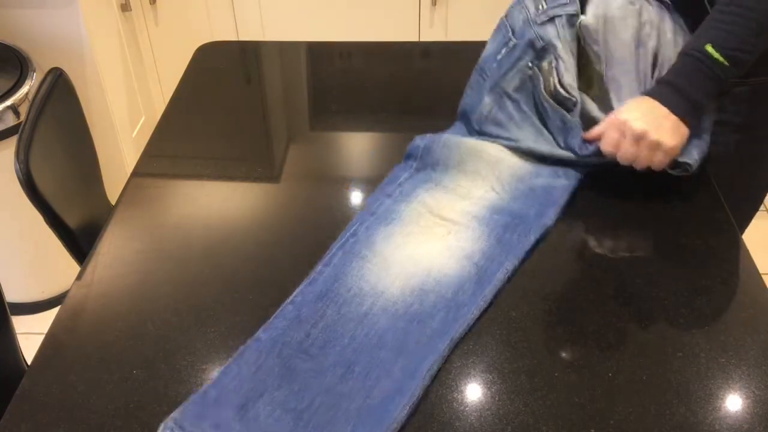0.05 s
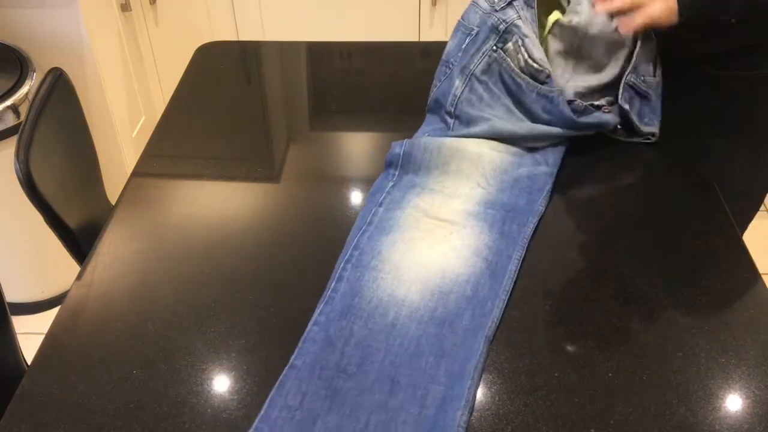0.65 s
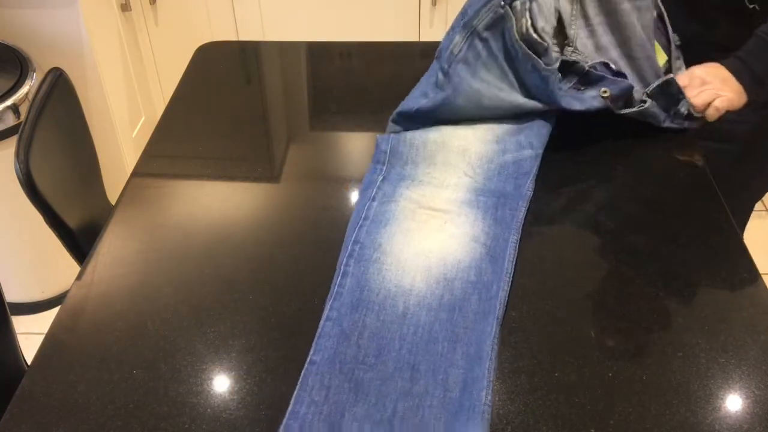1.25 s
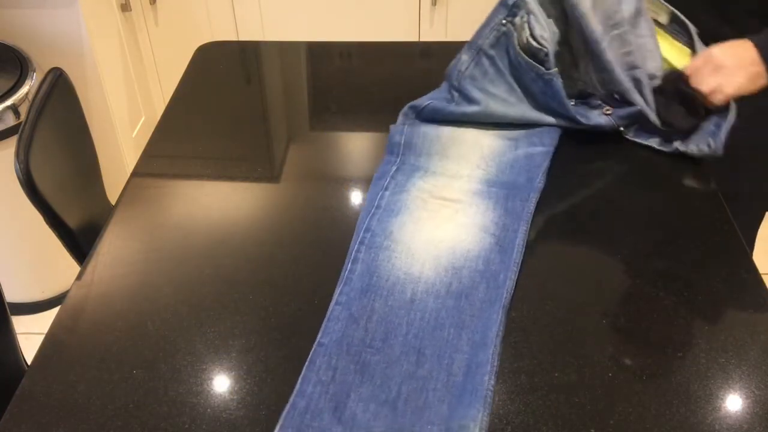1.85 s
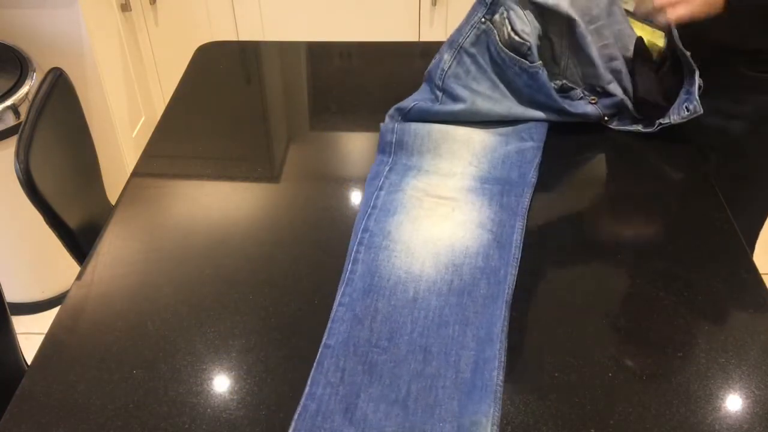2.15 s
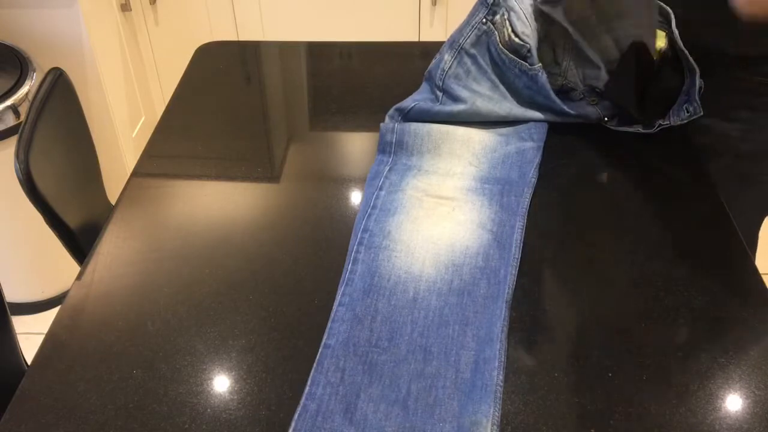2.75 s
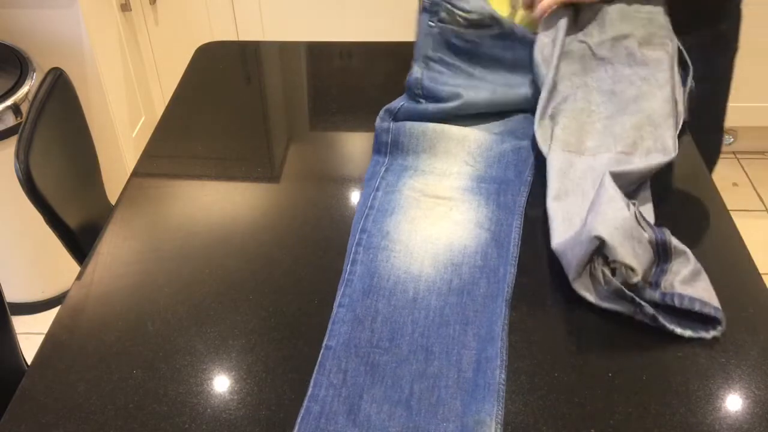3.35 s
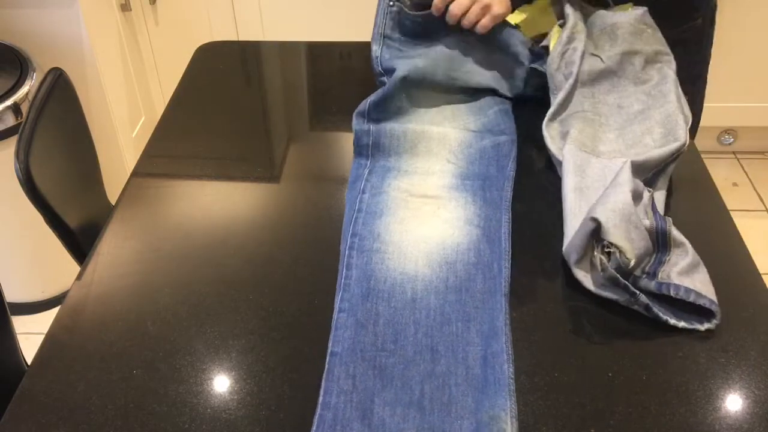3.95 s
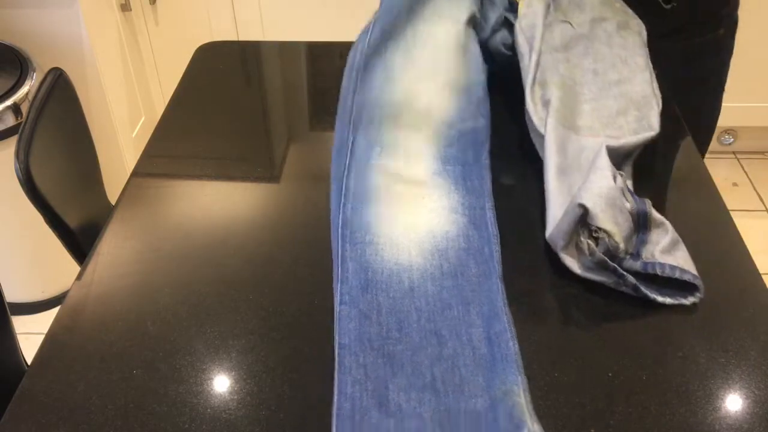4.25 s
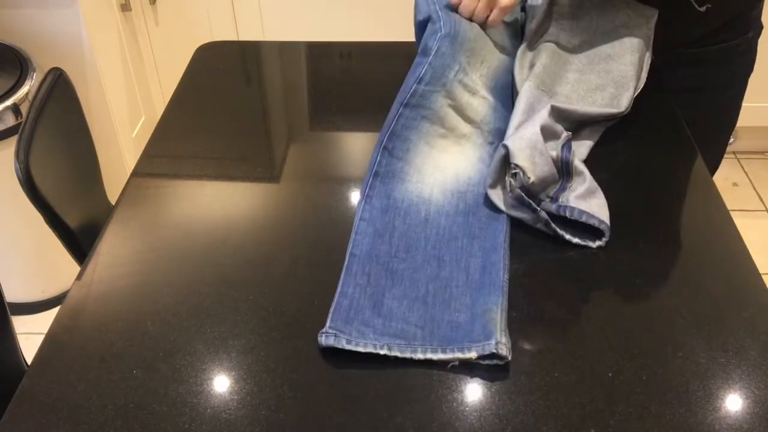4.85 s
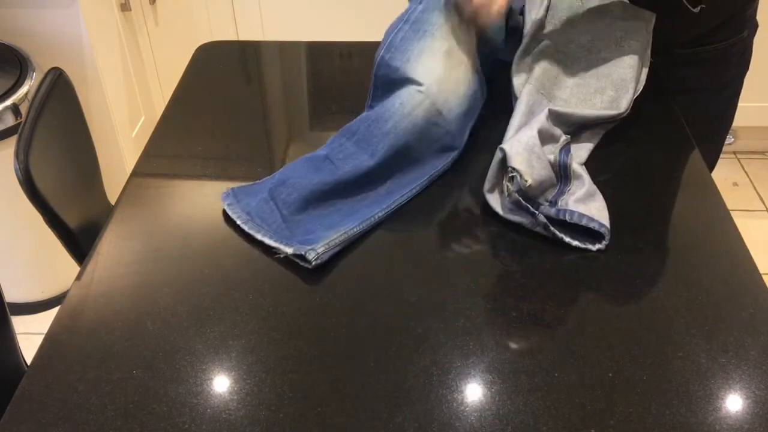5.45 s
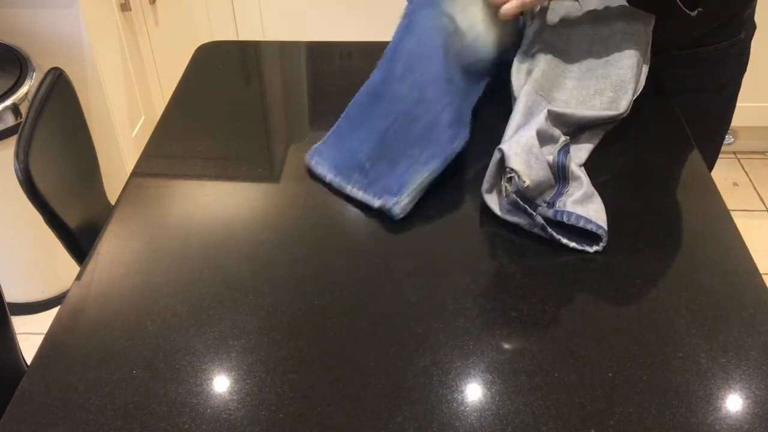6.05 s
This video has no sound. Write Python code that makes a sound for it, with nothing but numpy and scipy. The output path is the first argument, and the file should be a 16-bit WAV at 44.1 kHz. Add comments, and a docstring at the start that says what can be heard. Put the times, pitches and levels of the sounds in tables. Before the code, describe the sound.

Stiff denim flaps and rustles as a pair of jeans is handled on a kitchen counter, with a firmer thump as the cloth snaps taut. After a short lull, a rivet clicks and the waist button hits the stone with a brief metallic ring. The legs then drag and flop onto the surface again. Hard walls add a slight echo over faint, low room tone.

```python
"""A small kitchen, where a pair of heavy jeans is turned inside out on a stone worktop.
As the cloth is pulled, folds buckle in soft pops, the twill rasps and the fibres hiss.
The legs flop onto the stone, rivets and seams tick, and the metal waist button knocks and rings.
Hard walls add a short echo over a quiet room tone."""
import sys
import numpy as np
from scipy import signal
from scipy.fft import rfft, irfft
from scipy.io import wavfile
from scipy.ndimage import uniform_filter1d, map_coordinates

SR = 44100
rng = np.random.default_rng(int(sys.argv[2]) if len(sys.argv) > 2 else 0)


def master(y):
    """Save y as 16-bit WAV."""
    cut = np.clip(np.atleast_2d(y).T, -1, 1)
    pcm = np.round(cut * 32767)  # scale
    wavfile.write(sys.argv[1], SR, pcm.astype(np.int16))


N = 272979
TIME = np.arange(N) / SR

# the button strikes the stone, then chatters, held down by the cloth: t/s, crack gain/dB, ring gain/dB
BUTTON_HITS = [(3.183, -35, -27.5), (3.1868, -29.5, -42), (3.197, -42, -47), (3.204, -44, -49)]


def undb(db):
    """Decibels to gain."""
    return 10 ** (np.asarray(db) / 20)


def unit(x):
    """Scale to rms 1."""
    return x / np.sqrt(np.mean(x ** 2))


def add(out, start_s, x):
    """Mix x into out from start_s on."""
    i = max(int(start_s * SR), 0)
    out[i:i + len(x)] += x[:N - i]


def on_log_axis(hz, points):
    """Read a curve of (f/Hz, value) points at any frequency."""
    f, value = np.transpose(points)
    return np.interp(np.log(hz + 1), np.log(f), value)


def colour(x, eq, size=4096):
    """Minimum-phase EQ of unit energy, shaped by (f/Hz, level/dB) points."""
    gain = undb(on_log_axis(np.fft.rfftfreq(size, 1 / SR), eq))
    cepstrum = irfft(np.log(gain))
    cepstrum[1:size // 2] *= 2
    cepstrum[size // 2 + 1:] = 0
    response = irfft(np.exp(rfft(cepstrum)))
    return signal.fftconvolve(x, response / np.linalg.norm(response))[:len(x)]


def wander(rate_hz):
    """Smooth random modulation of rms 1, with rate_hz new targets a second."""
    hold = max(int(SR / rate_hz), 1)
    steps = np.repeat(rng.standard_normal(N // hold + 1), hold)
    return unit(uniform_filter1d(uniform_filter1d(steps, hold), hold)[:N])


def slips(per_s, scatter_db):
    """Grains of friction: tiny impulses of uneven size at random moments."""
    chance, size = rng.random(N), rng.standard_normal(N)
    return (chance < per_s / SR) * rng.choice([-1, 1], N) * undb(scatter_db * size)


def steady(x, span_s):
    """Even out the slow swells of a grain stream and keep its fine texture."""
    power = uniform_filter1d(x ** 2, max(int(span_s * SR), 1))
    return x / np.sqrt(np.abs(power) + np.mean(x ** 2) / 20)


def room_tone(level_db=-64.4, waver_db=0.7):
    """The quiet, low bed of the kitchen, wavering a little."""
    # colour of the background: f/Hz, level/dB
    air_eq = [(20, -16), (40, 1), (75, 5.5), (150, -1), (280, -4), (420, -7), (900, -12.5), (1600, -11.5),
              (1950, -7), (2700, -14), (5000, -21), (15000, -29)]
    return undb(level_db + waver_db * wander(1.5)) * unit(colour(rng.standard_normal(N), air_eq))


def kitchen_reverb(x, wet_db, predelay_s=0.00397, count=24000):
    """Mix in dense reflections off cupboards and tiles; the top end dies first."""
    # decay of the room: f/Hz, t60/s
    decay_times = [(100, 0.55), (300, 0.33), (1000, 0.6), (3000, 0.44), (8000, 0.43), (15000, 0.076)]
    t, tail = TIME[:count], 0
    edges_hz = np.geomspace(40, 18000, 10)
    for lo, hi in zip(edges_hz, edges_hz[1:]):
        bandpass = signal.butter(3, [lo, hi], "band", fs=SR, output="sos")
        band = signal.sosfilt(bandpass, rng.standard_normal(count))
        t60 = on_log_axis(np.sqrt(lo * hi), decay_times)
        tail = tail + band * np.exp(-np.log(1000) * t / t60)
    tail = tail * (t > predelay_s)
    echo = signal.fftconvolve(x, tail / np.linalg.norm(tail))[:N]
    wet = undb(wet_db)
    return (x + wet * echo) / np.hypot(1, wet)


def ticks(decay_s=0.0016, count=900):
    """Rivets, seams and stiff creases tick: a tiny burst of noise through one resonance."""
    # small hard contacts: t/s, peak level/dB, centre f/Hz, width/Hz
    contacts = [(.926, -40.5, 3900, 4000), (1.208, -54, 2500, 4050), (1.847, -50, 2250, 160),
                (3.0212, -24.5, 2670, 7060), (3.028, -25, 2600, 2940), (3.04, -27, 2400, 2400),
                (3.874, -38, 2420, 900), (5.713, -41.5, 3800, 4000), (6.028, -50, 2000, 900)]
    out = np.zeros(N)
    for start_s, db, hz, width_hz in contacts:
        burst = rng.standard_normal(count) * np.exp(-TIME[:count] / decay_s)
        tick = signal.lfilter(*signal.iirpeak(hz, hz / width_hz, fs=SR), burst)
        add(out, start_s, tick * undb(db) / np.abs(tick).max())
    return out


def button_cracks(decay_s=0.012, count=6000):
    """The attack of the button: each contact with the stone gives a short crack."""
    # colour of metal on stone: f/Hz, level/dB
    crack_eq = [(200, -9), (800, 4.5), (1500, 1.5), (2200, 11.5), (3500, 4), (4050, -8), (4400, -1),
                (4950, -6), (5700, 4), (7000, -10), (10000, -19), (16000, -19)]
    out, t = np.zeros(N), TIME[:count]
    for start_s, crack_db, _ in BUTTON_HITS:
        burst = rng.standard_normal(count) * np.exp(-t / decay_s)
        add(out, start_s, undb(crack_db) * colour(burst, crack_eq))
    return out


def button_ring(rock_db=2.2, rock_hz=80, count=26000):
    """Each contact rings the same modes; close pairs beat, and each flutters as the button rocks."""
    # modes of the knock: f/Hz, relative level/dB, t60/s
    modes = [(764, -16, .33), (822, -16, .27), (924, -14, .33), (1181, -18, .35), (1340, -20, .25),
             (1588, -22, .25), (1701, -15, .24), (1782, -21, .35), (1949, -18, .28), (2019, -14, .35),
             (2042, -20, .33), (2170, -11, .24), (2310, -15, .3), (2588, -6.5, .25), (2649, -12, .33),
             (2789, -20, .25), (2966, -21, .28), (3115, -10.5, .25), (3141, -15, .33), (3214, -21, .33),
             (3430, 6.5, .125), (3554, -17, .33), (3795, -19, .25), (3822, -14.5, .24), (4272, -16, .36),
             (4317, -18, .38), (4377, -20, .36), (4506, -20, .28), (4724, -15, .27), (5155, -16, .3),
             (5373, -19, .3), (5496, -23, .23), (5626, -18, .24), (5992, -17, .24), (7370, -25, .22),
             (7461, -28, .2), (8640, -26, .18)]
    out, t = np.zeros(N), TIME[:count]
    hz, mode_db, t60 = np.transpose(modes)[:, :, None]
    flutter_db = rock_db * np.array([wander(rock_hz)[:count] for _ in modes])
    envelopes = undb(mode_db + flutter_db) * np.exp(-np.log(1000) * t / t60)
    for start_s, _, ring_db in BUTTON_HITS:
        phase = rng.uniform(0, 2 * np.pi, hz.shape)
        ring = np.sum(envelopes * np.sin(2 * np.pi * hz * t + phase), axis=0)
        add(out, start_s, undb(ring_db) * ring)
    return out


def denim_flops(pocket_db=2, pocket_q=2.2, count=13000):
    """Fold after fold slaps down; soft cloth blunts the slaps and a pocket of air adds a hollow note."""
    # cloth landing or snapping taut: t/s, level/dB, low-pass f/Hz, settling time/s, air pocket f/Hz
    landings = [(.038, -35, 634, 0.026, 430), (.054, -40, 700, 0.025, 480), (.079, -45, 1400, 0.02, 640),
                (.099, -37.5, 1200, 0.021, 1040), (.114, -38.5, 790, 0.016, 450),
                (.127, -40.5, 1200, 0.012, 980), (.182, -45.5, 1210, 0.011, 650),
                (.561, -57.5, 600, 0.026, 310), (.692, -60, 450, 0.027, 330), (.745, -64, 700, 0.016, 420),
                (.799, -54.5, 460, 0.025, 290), (.971, -54.5, 800, 0.036, 560),
                (1.02, -55.5, 600, 0.03, 323), (1.076, -55, 800, .014, 420),
                (1.142, -56.5, 900, 0.028, 500), (1.205, -46, 1030, 0.022, 275),
                (1.507, -31.5, 1080, 0.017, 404), (1.533, -36, 510, 0.023, 253),
                (1.549, -35.5, 200, 0.02, 150), (1.570, -35, 300, 0.02, 246), (2.575, -55, 200, 0.024, 139),
                (2.994, -54, 200, 0.063, 260), (3.022, -38, 940, 0.023, 273),
                (3.034, -35.5, 880, 0.021, 400), (3.045, -43.5, 130, 0.049, 85),
                (3.19, -51, 450, 0.057, 279), (4.304, -54.5, 300, 0.035, 300),
                (4.364, -52.5, 450, 0.014, 330), (4.459, -52.5, 400, 0.034, 290),
                (5.108, -49.5, 850, 0.026, 243), (5.194, -50, 500, 0.022, 210),
                (5.359, -60, 700, 0.021, 380), (5.41, -55.5, 500, 0.028, 287),
                (5.518, -58.5, 800, 0.018, 450), (5.551, -54.5, 453, 0.012, 300),
                (5.705, -44.5, 850, 0.021, 430), (5.722, -44.5, 800, 0.016, 537),
                (5.915, -49.5, 600, 0.018, 290), (6.027, -54.5, 900, 0.034, 500)]
    # colour of a slap before it is blunted: f/Hz, level/dB
    slap_eq = [(25, -34), (65, -9.5), (110, -6), (155, -2.5), (200, -7.5), (270, 2.5), (450, -5),
               (650, -2.5), (1500, -3), (4000, -8.5), (15000, -15)]
    out, t = np.zeros(N), TIME[:count]
    for start_s, db, soft_hz, settle_s, pocket_hz in landings:
        slaps = slips(per_s=1100, scatter_db=3.15)[:count] * np.exp(-t / settle_s)
        slaps[0] += 1.6  # one edge lands first
        thud = colour(slaps, slap_eq)
        for corner_hz in (soft_hz, 2 * soft_hz):
            thud = signal.sosfilt(signal.butter(1, corner_hz, fs=SR, output="sos"), thud)
        pocket = signal.lfilter(*signal.iirpeak(pocket_hz, pocket_q, fs=SR), thud)
        flop = thud + undb(pocket_db) * pocket
        add(out, start_s, flop * undb(db) * np.sqrt(settle_s * SR / np.sum(flop ** 2)))
    return out


def cloth_speed(start_s, rise_s, length_s, release_s=0.048):
    """Envelope of one stroke: the cloth picks up speed smoothly, then comes to rest after length_s."""
    t = TIME - start_s
    attack = np.sin(np.pi / 2 * np.clip(t / rise_s, 0, 1)) ** 2
    return attack * np.exp(-np.maximum(t - length_s, 0) / release_s)


def stroke_envelopes(creep_rise_s=0.013, creep_db=(-72, -78.5, -78)):
    """One motion drives folds, rasp and hiss; overlapping strokes and a faint creep add in power."""
    # tugs, drags and shuffles: t/s, rise/s, length/s, fold gain/dB, rasp gain/dB, hiss gain/dB
    strokes = [ (0.0, 0.00047, 0.12, -43, -54, -65.5), (.22, 0.026, .28, -65, -66, -81),
               (.53, 0.049, 0.12, -62.5, -71, -76.5), (.74, 0.025, 0.094, -56, -64.5, -71),
               (.92, 0.011, 0.16, -58, -66, -72.5), (1.079, 0.22, 0.26, -51.5, -50, -62.5),
               (1.359, 0.064, 0.215, -45.5, -59, -63.5), (1.76, 0.017, 0.024, -68, -80, -73),
               (1.837, 0.013, 0.082, -63.5, -59, -79), (2.445, 0.057, 0.038, -57.5, -60.5, -77),
               (2.52, 0.053, 0.097, -64.5, -65, -73.5), (2.80, 0.076, 0.1, -59, -56, -69),
               (2.91, 0.027, 0.051, -67, -60, -64), (3.071, 0.024, 0.12, -55, -45.5, -60.5),
               (3.335, 0.011, 0.03, -66, -57, -68), (3.40, 0.016, 0.12, -57, -69, -72.5),
               (3.52, 0.025, 0.1, -55.5, -60.5, -71), (3.65, 0.014, 0.015, -71, -65, -69.5),
               (3.73, 0.041, 0.13, -69.5, -64.5, -73.5), (3.825, 0.055, 0.095, -64.5, -60, -56.5),
               (3.95, 0.017, 0.023, -75, -59, -71), (4.08, 0.08, 0.055, -77, -68, -73),
               (4.309, 0.15, 0.33, -57, -63.5, -74), (4.68, 0.14, 0.19, -57, -73, -75.5),
               (4.92, 0.02, 0.033, -62.5, -82, -74.5), (5.06, 0.088, 0.17, -48.5, -56, -65.5),
               (5.359, 0.019, 0.04, -58, -68.5, -73), (5.51, 0.043, 0.083, -59.5, -73, -74),
               (5.71, 0.089, 0.18, -62, -63.5, -68), (5.79, 0.076, 0.11, -47, -55.5, -66.5),
               (6.03, 0.089, 0.11, -61.5, -64, -74)]
    # jeans in hand, the cloth creeping between strokes: t/s, length/s
    in_hand = [(0.0, 1.6), (2.45, 2.5), (5.09, 1.1)]
    creep = [(start_s, creep_rise_s, length_s, *creep_db) for start_s, length_s in in_hand]
    power = 0
    for start_s, rise_s, length_s, *gains_db in strokes + creep:
        power = power + np.outer(undb(gains_db), cloth_speed(start_s, rise_s, length_s)) ** 2
    return np.sqrt(power)


def denim_rustle(fold_db=0.5, rasp_db=1, hiss_db=5.5, drift_octaves=0.17):
    """Folds buckle in soft pops; threads catch and slip in bunches; fibres brush."""
    # colours of the dull folds, the midrange twill rasp and the bright fibre hiss: f/Hz, level/dB
    fold_eq = [(30, -18.5), (70, -6.5), (130, -10), (200, -6.5), (280, 3), (360, -2.5), (450, -6),
               (650, -8.5), (1000, -19), (2000, -19), (5000, -77)]
    rasp_eq = [(300, -10.5), (700, -3.5), (1100, 3), (1550, 0), (2100, 3.5), (2800, -6), (3500, -4),
               (5000, -10.5), (9000, -19.5)]
    hiss_eq = [(1200, -30.5), (2500, 4.5), (4000, 1), (5000, -1.5), (6500, -0.5), (8000, -5), (9500, -1),
               (10400, -8.5), (12000, -4.5), (15500, -16.5)]
    grip = wander(55)  # the cloth sticks and lets go
    pops = slips(per_s=380, scatter_db=2.35)
    folds = steady(colour(pops, fold_eq), span_s=0.18)
    drift = 2 ** (drift_octaves * wander(7))  # resonances wander as folds grow and shrink
    folds = map_coordinates(folds, [np.cumsum(drift)], order=1, mode="mirror")
    catches = slips(per_s=1800, scatter_db=1.54) * undb(1.7 * grip)
    rasp = steady(colour(catches, rasp_eq), span_s=0.13)
    brushes = slips(per_s=9000, scatter_db=2.1) * undb(grip)
    hiss = steady(colour(brushes, hiss_eq), span_s=0.057)
    fold_envelope, rasp_envelope, hiss_envelope = stroke_envelopes()
    return (undb(fold_db) * folds * fold_envelope
            + undb(rasp_db) * rasp * rasp_envelope
            + undb(hiss_db) * hiss * hiss_envelope)


def scene():
    """Cloth and metal on the worktop over the room tone, in mono; the ring is the driest layer."""
    cloth = kitchen_reverb(denim_rustle() + denim_flops(), wet_db=-5.5)
    cracks = kitchen_reverb(ticks() + button_cracks(), wet_db=-5.0)
    ring = kitchen_reverb(button_ring(), wet_db=-11)
    return (cloth + cracks + ring + room_tone())[None]


def record(dry):
    """A steep low-pass takes off the very top."""
    top_hz = 15800
    return signal.sosfilt(signal.ellip(10, .2, 70, top_hz, fs=SR, output="sos"), dry)


dry = scene()
out = record(dry)
master(out)
```